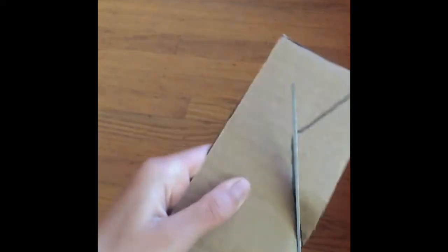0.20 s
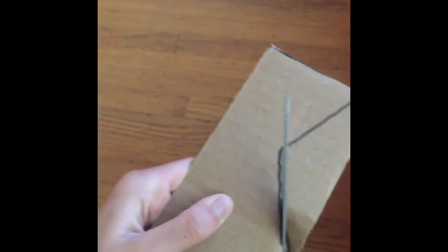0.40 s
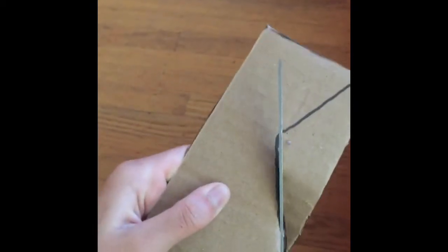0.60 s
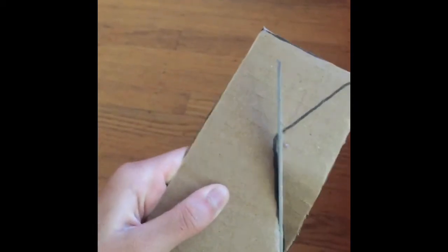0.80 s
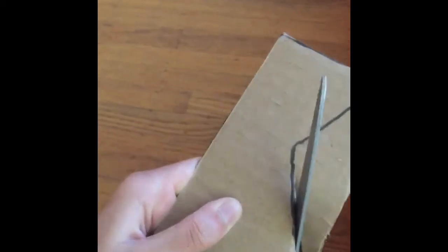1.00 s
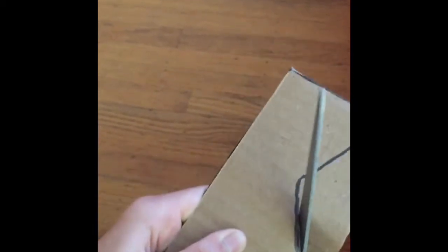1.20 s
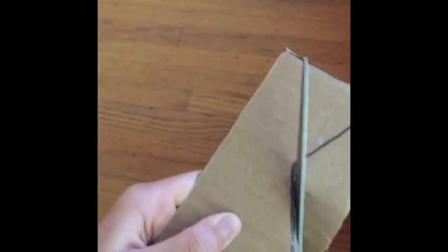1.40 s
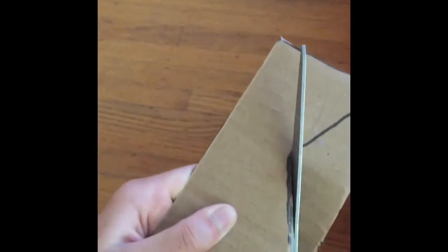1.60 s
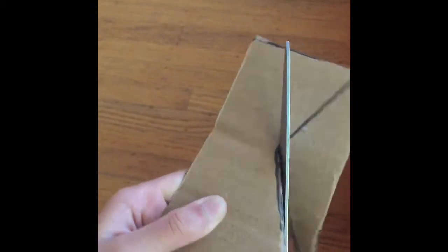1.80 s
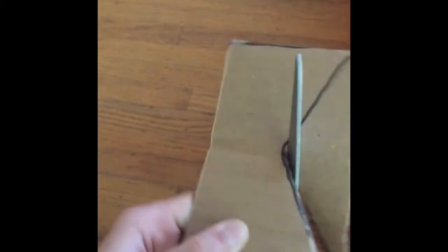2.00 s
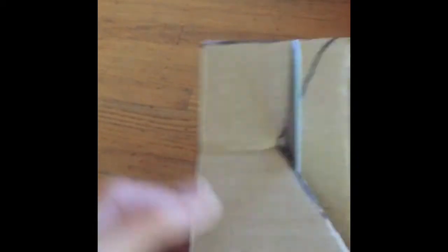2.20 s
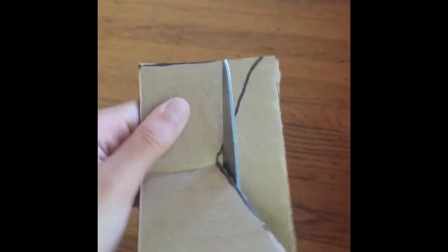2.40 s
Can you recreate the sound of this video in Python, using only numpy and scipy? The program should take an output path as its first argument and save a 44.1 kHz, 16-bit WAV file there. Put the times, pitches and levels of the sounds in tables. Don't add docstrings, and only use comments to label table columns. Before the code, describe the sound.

Scissors cut stiff corrugated cardboard in two crunchy snips, with rubbing and handling between, close up

```python
import sys
import numpy as np
from scipy import signal
from scipy.fft import rfft, irfft, next_fast_len
from scipy.io import wavfile
from scipy.ndimage import map_coordinates

SR = 44100
rng = np.random.default_rng(int(sys.argv[2]) if len(sys.argv) > 2 else 0)


def volts_from_db(level):
    exponent = np.asarray(level, float) / 20
    return 10 ** exponent


def wav_out(sig):
    wavfile.write(sys.argv[1], SR, np.round(np.clip(np.atleast_2d(sig).T, -1, 1) * 32767).astype(np.int16))


N = 110250
TIME = np.arange(N) / SR


def unit(x):
    return x / np.sqrt(np.mean(x ** 2) + 1e-20)


def along(points, hz):
    f, v = np.transpose(points)
    return np.interp(np.log(hz + 1), np.log(f + 1), v)


def filtered(x, response):
    m = next_fast_len(N + SR // 2)
    gain = response(np.fft.rfftfreq(m, 1 / SR))
    gain = gain / np.sqrt(np.mean(abs(gain) ** 2))
    return irfft(rfft(x, m) * gain, m)[:N]


def coloured(x, spectrum):
    return filtered(x, lambda f: volts_from_db(along(spectrum, f)))


def wobble(rate):
    knots = rng.standard_normal(int(N * rate / SR) + 4)
    return map_coordinates(knots, [TIME * rate])


def grains(spread_db, slow):
    size_db = spread_db * (wobble(2500) + wobble(600) + slow * wobble(120))
    return unit(rng.standard_normal(N) * volts_from_db(size_db))


def strokes(tables, spread_db):
    out = np.zeros((2, N))
    for s, db, dry_db in map(np.transpose, tables):
        for drive, level in zip(out, (db, db + dry_db)):
            drive += volts_from_db(np.interp(TIME, s, level, -200, -200))
    return out * grains(spread_db, slow=0.47)


# f/Hz, level/dB per Hz
ROOM_TONE = [(26, -37), (45, -14), (123, -11), (340, -35), (800, -30), (1300, -32), (5000, -39.5),
             (11000, -41)]


def room_tone():
    level_db = -61.5 + 3.7 * wobble(8.17)
    return volts_from_db(level_db) * coloured(rng.standard_normal(N), ROOM_TONE)


# t/s, pressure level/dB, dryness level/dB
RUB_STROKES = [
    [(0, -56, -2.5), (.055, -72, 7), (.1, -61.5, 2), (.125, -85, -9), (.18, -66, 7)],
    [(.183, -52, -7), (.2, -40.5, 3.5), (.29, -40, -3), (.335, -34, -7), (.385, -36, -16), (.43, -62, -11)],
    [(.912, -71, 0), (.925, -44.5, 9.5), (.945, -33, -18), (.98, -33, -12.5), (1.04, -46.5, -0.5),
     (1.07, -57, -16)],
    [(1.13, -61, 2), (1.16, -54, 0), (1.23, -66, -5.5)],
    [(1.85, -67.5, -5), (1.88, -51.5, -1), (1.915, -60, 10), (1.925, -67.5, -1), (1.95, -41, -0.5),
     (1.985, -44, 5), (2.005, -50, -26)],
    [(2.045, -71.5, 2), (2.075, -42, -3.5), (2.12, -45, -5.5), (2.165, -41, -7), (2.22, -42.5, -16.5),
     (2.265, -75.5, 7)],
    [(2.285, -88, 14), (2.345, -70, 13.5), (2.435, -86, 12)],
]


def rubs():
    return strokes(RUB_STROKES, spread_db=2.2)


# f/Hz, level/dB per Hz
NAP_SPECTRUM = [(700, -21), (1940, -8), (3300, 0), (4660, -4.5), (9250, 1.5), (10400, -3), (15700, -8)]


def nap_hiss(drive):
    return coloured(drive, NAP_SPECTRUM)


# [(f/Hz, level/dB)]
SHEET_STATES = [(.22, 11, -5.5, [(220, -9), (650, 1.5), (1150, 0.5), (1600, 2.5), (2150, 0), (2950, 1)]),
                (0.338, 9, -8, [(100, -4), (720, 1.5), (1160, 0), (1650, 5), (2200, 5.5), (2900, 1)]),
                (.48, 3.6, -17, [(140, -21), (700, 3), (1170, -1), (2220, 9.5), (3150, 5)]),
                (0.559, 8.4, -26, [(150, 5), (765, 4.5), (1250, -7.5), (1900, 4.5), (2290, 1), (3080, 4)]),
                (0.628, 8, -33, [(235, -3.5), (820, 6), (1480, 3.5), (2260, 8), (3010, 3)]),
                (.69, 7.5, -32, [(260, -6.5), (1000, 11), (1880, -1.5), (2850, 9)]),
                (0.929, 7.4, 2, [(250, -5.5), (850, 2), (1800, 13.5), (2600, 0)]),
                (1.008, 3.3, -17.5, [(150, -33), (700, -5), (1170, -3.5), (1750, 3.5)]),
                (1.12, 6.3, -1, [(155, -13), (770, 6), (1350, 0.5), (1880, 6)]),
                (1.45, 10.5, -36, [(242, 5.5), (1060, 11), (1490, 2.5), (1850, 4.5), (3100, -6)]),
                (1.62, 4.4, -10, [(280, 6), (1000, 10.5), (1430, 4), (2330, 2.5), (3110, -7.5)]),
                (1.721, 4.3, -1, [(200, 6.5), (600, 2), (950, 4), (1700, 1)]),
                (1.932, 3.9, -7.5, [(300, -23), (780, 12), (1500, 6.5), (2200, 6.5)]),
                (2.09, 6.4, 5, [(330, 6.5), (450, 9.5), (770, 5.5), (1380, 6), (2900, 0.5)]),
                (2.172, 2.7, -2.5, [(300, 9.5), (650, 8), (1030, 5), (1800, -0.5), (3000, -2)]),
                (2.45, 5, -1.5, [(110, 0), (520, 11), (1100, 4), (3100, 9)])]


def body(sharp, hollow_db, modes):
    hollow_hz, hollow_wide_hz = 460, 450

    def response(f):
        ring = 0
        for k, (hz, db) in enumerate(modes):
            width = hz / (sharp if k else 4)
            mode = 1j * f * width / (hz ** 2 - f * f + 1j * f * width)
            ring = ring + (-1) ** k * volts_from_db(db) * mode
        off_centre = hollow_hz ** 2 - f * f
        damping = 1j * f * hollow_wide_hz
        return ring * (off_centre + damping * volts_from_db(hollow_db)) / (off_centre + damping)
    return response


def sheet(drive):
    times = [row[0] for row in SHEET_STATES]
    out = np.zeros(N)
    for row, pick in zip(SHEET_STATES, np.eye(len(SHEET_STATES))):
        share = np.interp(TIME, times, pick)
        out += filtered(drive * share, body(*row[1:]))
    return out


# f/Hz, t60/s
WALL_DECAY = [(200, 0.16), (12000, 0.063)]


def walls(x):
    hz, t, z = signal.stft(rng.standard_normal(SR // 3), SR, nperseg=256)
    decay = volts_from_db(-60 * t / along(WALL_DECAY, hz)[:, None])
    tail = signal.istft(z * decay, SR, nperseg=256)[1]
    delayed = np.pad(x, (200, 0))
    return volts_from_db(-15) * signal.fftconvolve(delayed, tail / np.linalg.norm(tail))[:N]


# t/s, peak level/dB, dryness level/dB
FIBRE_SNAPS = [(0.2241, -0.5, -18), (0.26, -26, 15), (0.3905, -15, -3), (0.483, -7.5, -10),
               (0.557, -11.5, 11), (0.605, -0.5, -1), (0.642, -23, -3), (0.7757, -18.5, 2.5),
               (0.788, -29.5, -10), (0.9728, 1.5, -26), (0.987, -18, -11), (1.004, -8, -7), (1.02, -14, -8),
               (1.024, -10, -11), (1.4491, -11.5, 9), (1.4732, -18, 5), (1.483, -18, 14), (1.5801, -5.5, 9),
               (1.667, -23, 5), (1.725, -18, 16.5), (2.071, -22, 12.5), (2.0879, -7, -2), (2.1478, -18, -3),
               (2.4574, -8.5, 1.5)]


def snaps():
    t60_s = .0045
    out = np.zeros((2, N))
    for s, db, dry_db in FIBRE_SNAPS:
        crack = volts_from_db(-60 * np.clip(TIME - s, 0, 1) / t60_s) * (TIME >= s)
        out += volts_from_db([[db - 17.5], [db - 20 + dry_db]]) * crack
    return out * np.sign(rng.standard_normal(N))


# f/Hz, level/dB per Hz
FIBRE_SPECTRUM = [(700, -38), (1940, 4.5), (3300, -1), (5140, -7.5), (5560, -3.5), (8280, 0.5), (15700, -2)]


def fibre_hiss(drive):
    return coloured(drive, FIBRE_SPECTRUM)


def shake(drive):
    hz = 90
    return volts_from_db(-20.5) * filtered(drive, lambda f: (1j * f * hz / (hz ** 2 - f * f + 1j * f * hz)) ** 3)


# t/s at which full force is reached, level/dB, length of the hold/s, dryness level/dB
FLUTE_CRUNCHES = [(0.474, -41, 0.0039, 0.5), (0.553, -44, 0.019, 11), (0.604, -34, 0.023, -3),
                  (0.634, -25.5, 0.0066, -0.5), (0.645, -33, 0.0041, -17), (0.691, -34, 0.0069, -3),
                  (0.706, -32.5, 0.001, 2), (0.716, -30, 0.0045, -2.5), (0.747, -39.5, 0.005, -4.5),
                  (0.926, -39, 0.0089, -2.5), (.938, -27, 0.0016, -6), (0.979, -24.5, 0.0047, -17),
                  (.321, -35.5, 0.0029, -23), (1.095, -51, 0.0034, -12), (1.106, -26, 0.0073, 2.5),
                  (1.1185, -22.5, 0.0038, -2), (1.127, -38, 0.0018, -16), (1.259, -55.5, 0.017, -1),
                  (1.365, -56.5, 0.0025, 15.5), (1.417, -32, 0.004, 5.5), (1.44, -45.5, 0.0036, 10.5),
                  (1.46, -43, 0.0056, 11), (1.485, -33.5, 0.0058, 6), (1.511, -31, 0.0028, -0.5),
                  (1.528, -44, 0.013, 6.5), (1.561, -40.5, 0.0051, 2), (1.578, -33, 0.0017, 1.5),
                  (1.616, -43.5, 0.0026, 6.5), (1.632, -17, 0.002, -1.5), (1.701, -25, 0.0047, 0),
                  (1.742, -40, 0.0074, -9), (2.029, -58.5, 0.018, 6), (2.459, -39, 0.004, -30)]


def crunches():
    out = np.zeros((2, N))
    grit = grains(2.3, slow=0)
    for s, db, length, dry_db in FLUTE_CRUNCHES:
        t = TIME - s
        rise = np.clip(t / (1.3 * length) + 1, 0, 1) ** 2
        shape = rise * np.exp(-np.clip(t - length, 0, 1) / .0018)
        burst = shape * grit
        even = np.linalg.norm(shape) / np.linalg.norm(burst)
        out += volts_from_db([[db], [db + dry_db]]) * burst * even
    return out


# t/s, level/dB, f/Hz, t60/s
FLEX_THUMPS = [(1.108, -31, 82, 0.11), (1.118, -25, 158, 0.044), (1.128, -26.5, 112, 0.03),
               (0.331, -57, 90, 0.1), (1.502, -42, 97, 0.099), (1.633, -29, 112, 0.12),
               (1.658, -40.5, 60, 0.21), (1.696, -42, 51.5, 0.29), (2.041, -34.5, 44.4, 0.35),
               (2.072, -31, 46.3, 0.25), (2.149, -37.5, 128, 0.12), (2.461, -37.5, 102, 0.13),
               (.61, -38.5, 202, 0.15), (.637, -47, 254, 0.17), (0.689, -40, 260, 0.13),
               (1.412, -40, 240.4, 0.11), (1.513, -37.5, 257, 0.049), (.651, -30, 979, 0.064),
               (.691, -27, 984, 0.026), (0.716, -38.5, 1017, 0.081), (.749, -42.5, 924, 0.043),
               (1.419, -42, 1078, 0.079), (1.512, -32, 1010, .04), (1.633, -31, 960, 0.1),
               (1.113, -24.5, 1254, 0.041)]


def thumps():
    rise_s = 0.00087
    out = np.zeros(N)
    for s, db, hz, t60 in FLEX_THUMPS:
        t = np.clip(TIME - s, 0, 9)
        swell = volts_from_db(db - 60 * t / t60) * (1 - np.exp(-t / rise_s))
        out += swell * np.sin(2 * np.pi * hz * t + .5 * wobble(39.94))
    return out


# t/s, pressure level/dB, dryness level/dB
CUT_STROKES = [
    [(.455, -56, -15), (.475, -51.5, 8.5), (.54, -37.5, -2.5), (.6, -44.5, 9), (.66, -39.5, 2.5),
     (.685, -47, -3), (.73, -52.5, 12.5), (.765, -53.5, 4.5), (.795, -73, 14)],
    [(1.36, -72, 11), (1.41, -49.5, 7), (1.47, -60, 5.5), (1.5, -41.5, 3.5), (1.545, -55.5, 4.5),
     (1.59, -57.5, 8), (1.65, -37.5, -4), (1.74, -42.5, -2), (1.82, -63, -18)],
]


def cuts():
    return strokes(CUT_STROKES, spread_db=3.6)


# centre t/s, level/dB, f/Hz, width/s
BEND_CREAKS = [
    (2.179, -38, 620, .005),
    (2.199, -21.5, 690, .004),
    (2.21, -29, 760, .0035),
    (2.09, -34, 450, .003),
    (2.149, -38, 1030, .004),
]


def creaks():
    glide = 1800
    out = np.zeros(N)
    for s, db, hz, width in BEND_CREAKS:
        t = TIME - s
        swell = volts_from_db(db) * np.exp(-.5 * (t / width) ** 2)
        out += swell * np.sin(2 * np.pi * (hz + glide * t / 2) * t + .5 * wobble(150))
    return out


def scene():
    rub = rubs()
    tear = snaps() + crunches() + cuts()
    card = sheet(rub[0] + tear[0]) + nap_hiss(rub[1]) + fibre_hiss(tear[1])
    card += shake(tear[0]) + thumps() + creaks()
    return (room_tone() + card + walls(card))[None]


def roll_off(x):
    return signal.sosfilt(signal.butter(12, 17110, fs=SR, output="sos"), x)


def record(dry):
    top_hz, low_hz = 15600, 42
    soft = signal.sosfilt(signal.butter(36, top_hz, fs=SR, output="sos"), dry)
    mix = signal.sosfilt(signal.butter(5, low_hz, "high", fs=SR, output="sos"), soft)
    return roll_off(mix)


dry = scene()
out = record(dry)
wav_out(out)
```